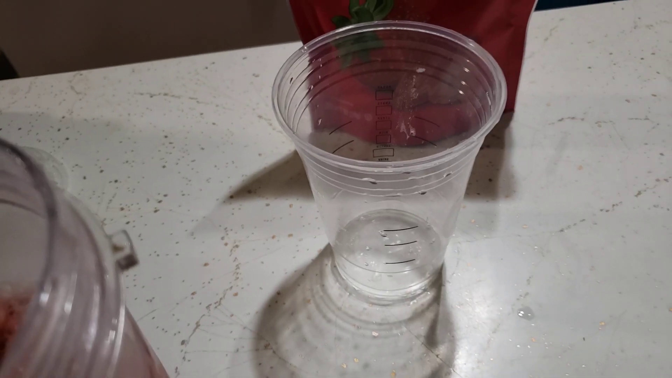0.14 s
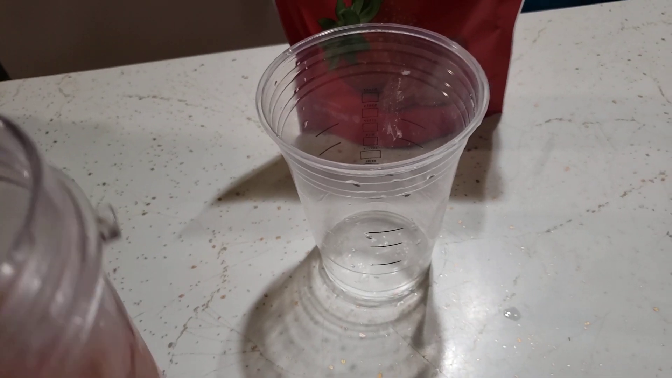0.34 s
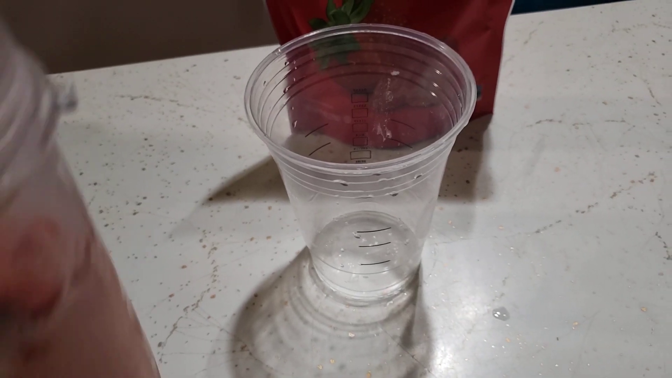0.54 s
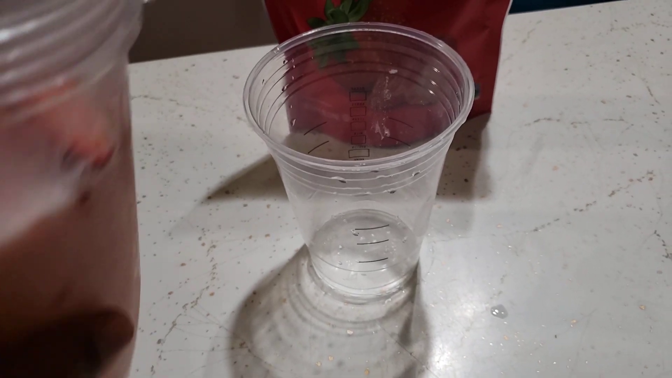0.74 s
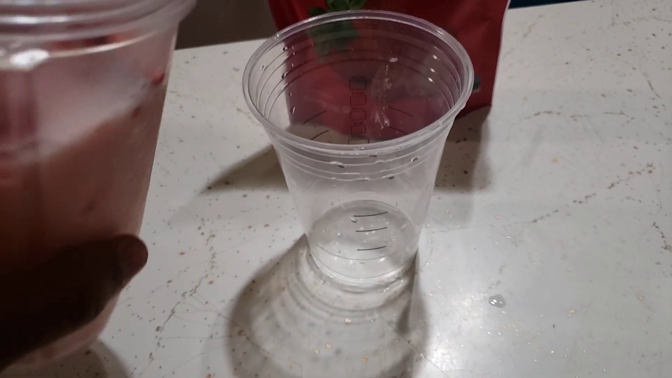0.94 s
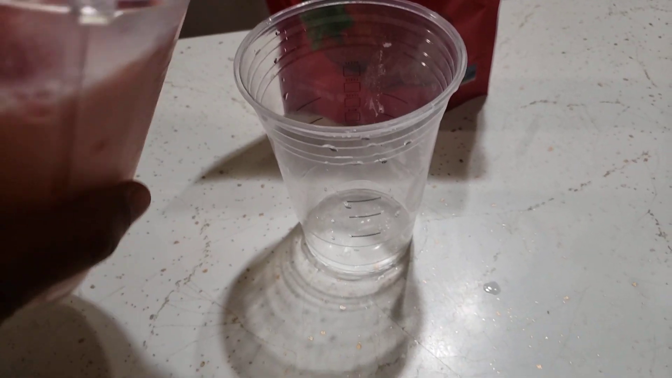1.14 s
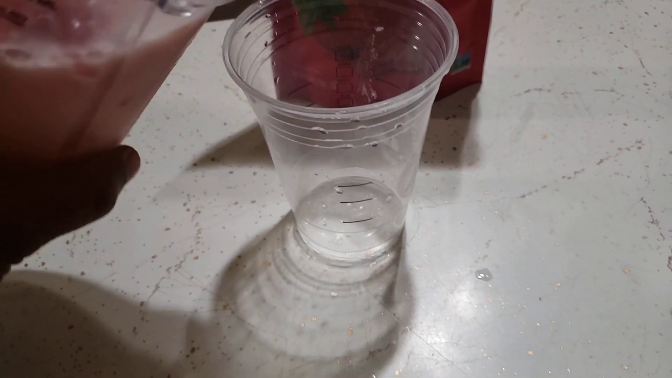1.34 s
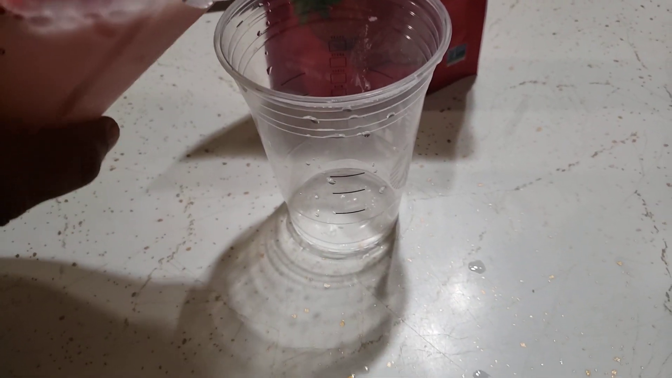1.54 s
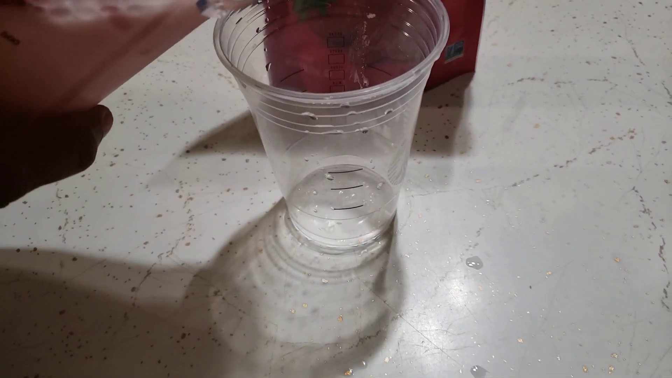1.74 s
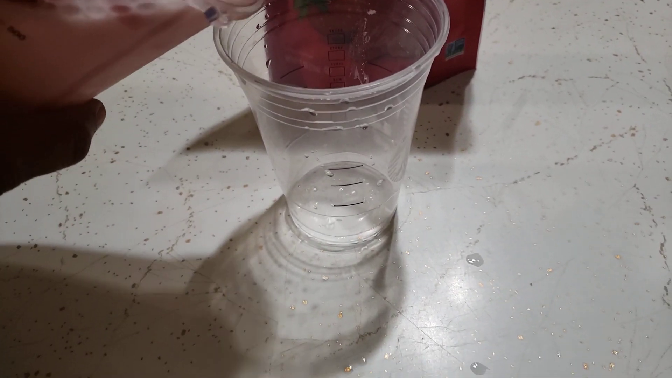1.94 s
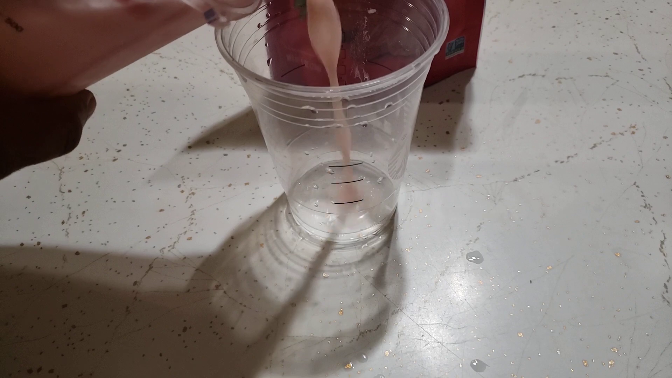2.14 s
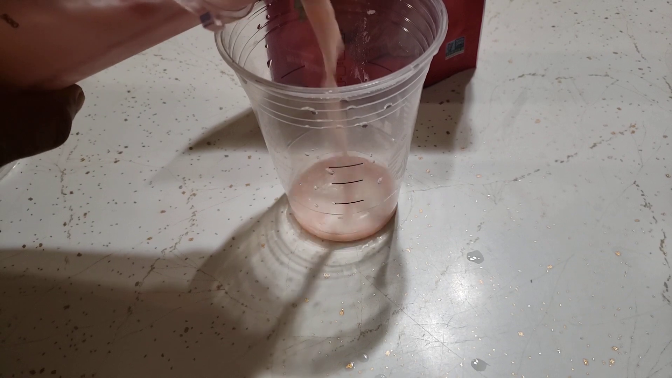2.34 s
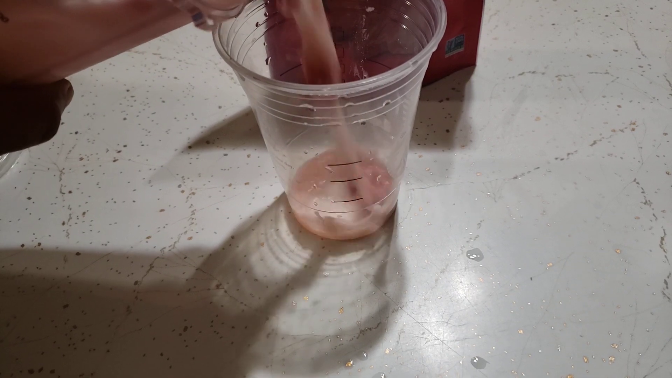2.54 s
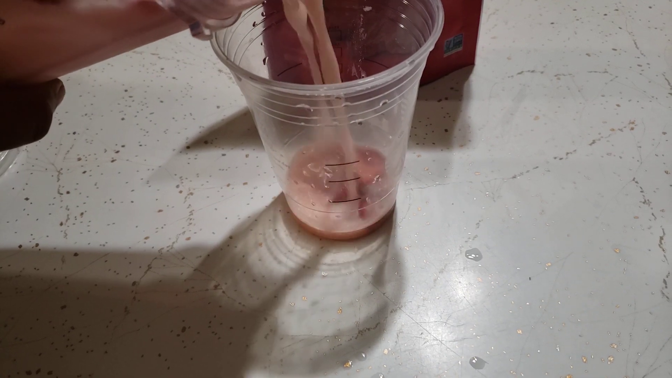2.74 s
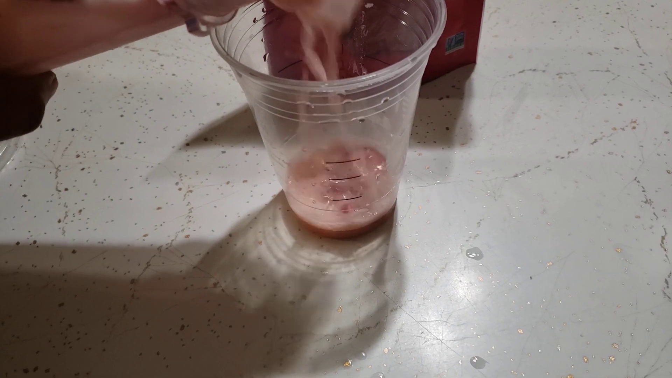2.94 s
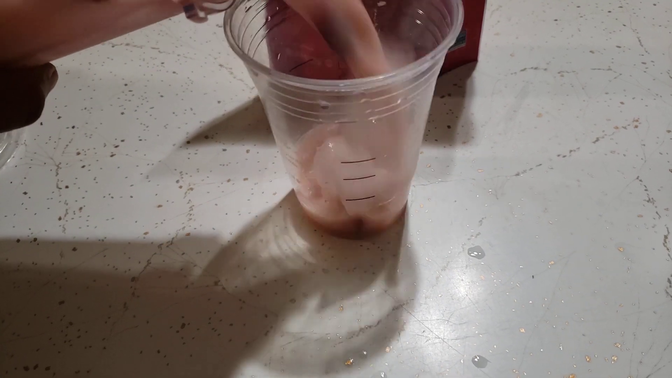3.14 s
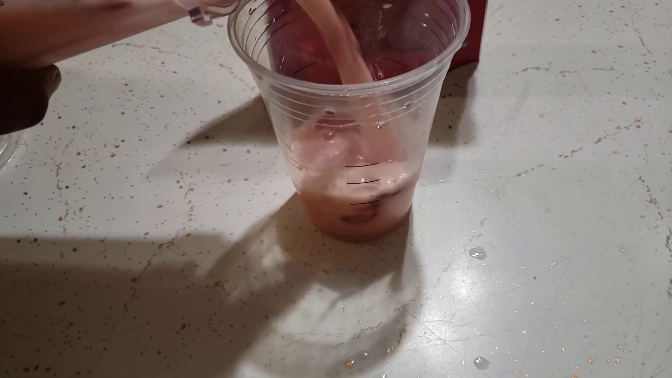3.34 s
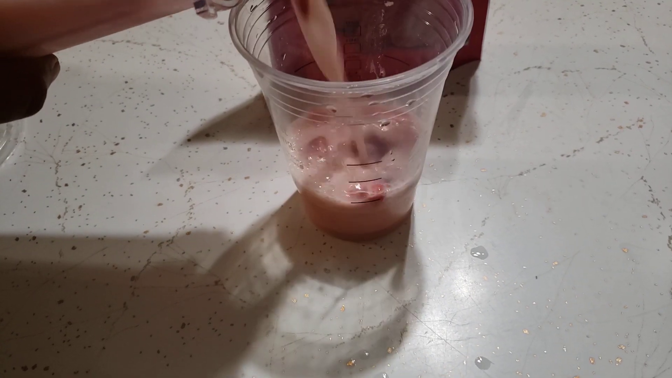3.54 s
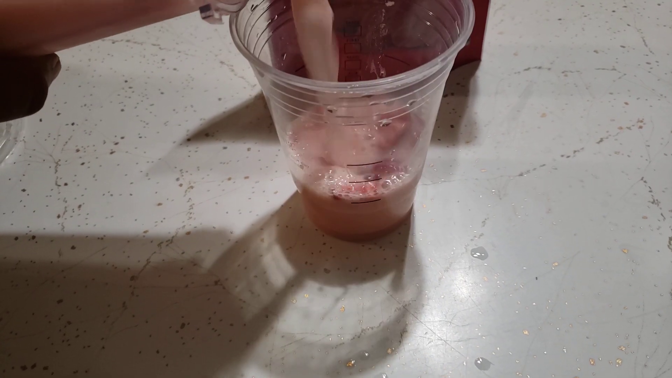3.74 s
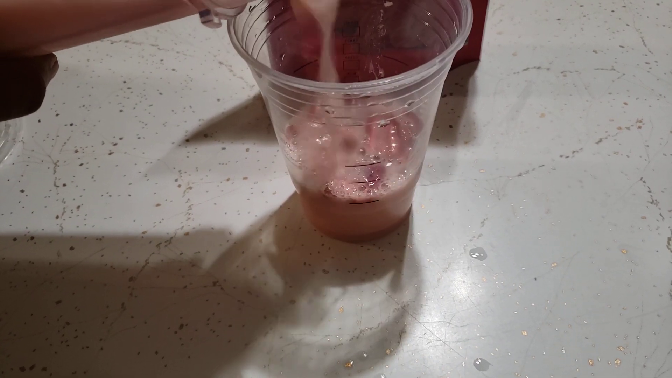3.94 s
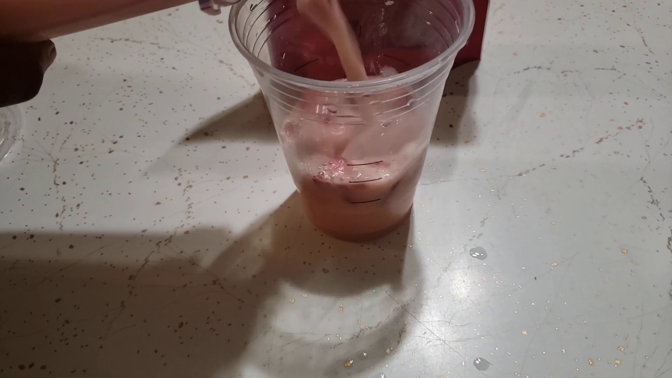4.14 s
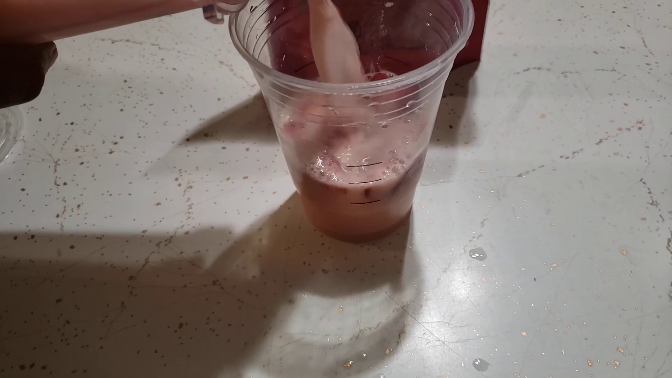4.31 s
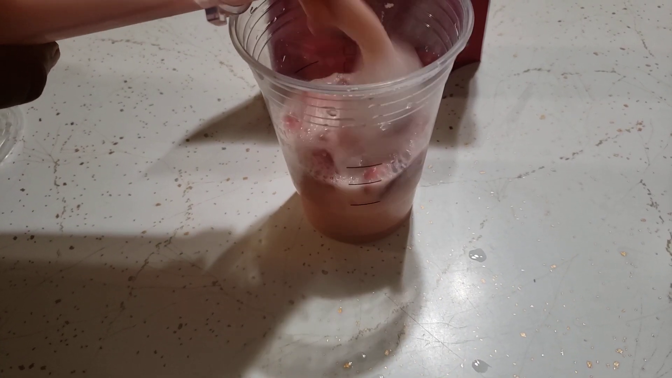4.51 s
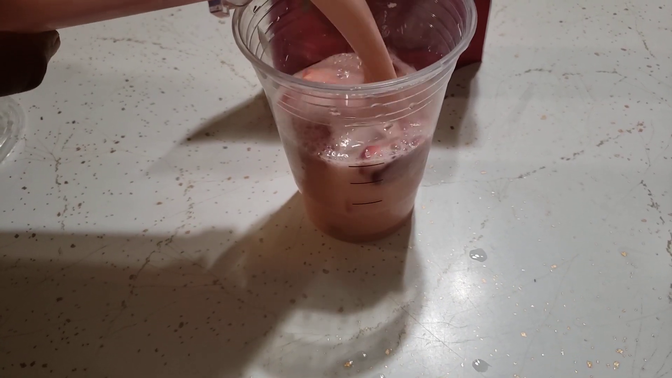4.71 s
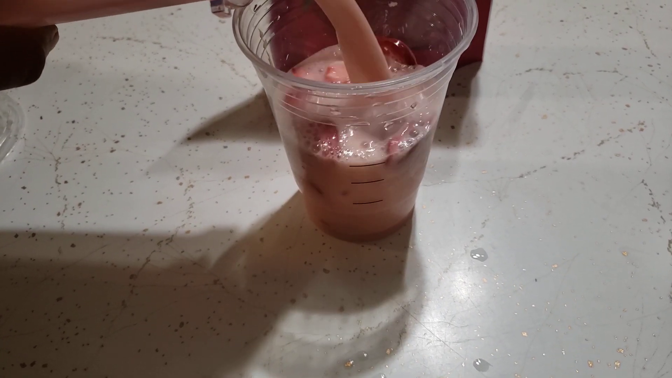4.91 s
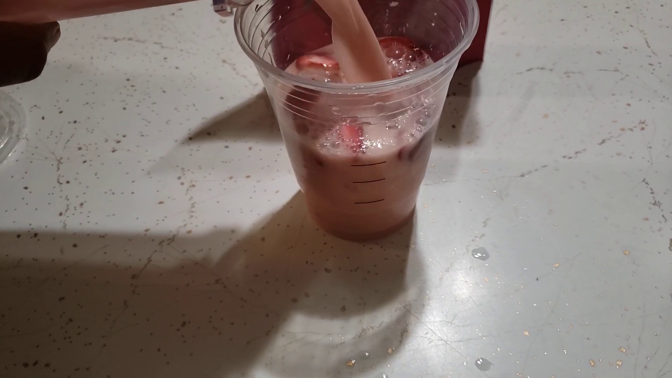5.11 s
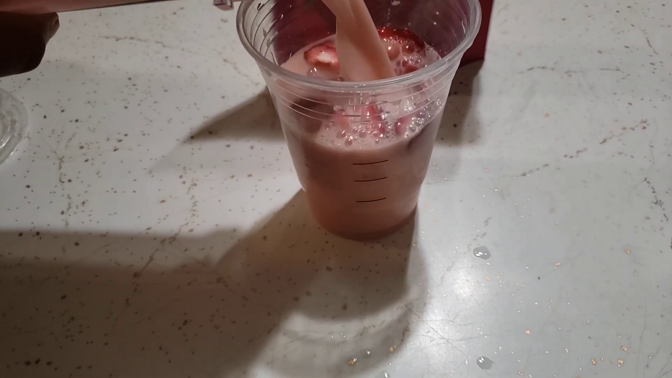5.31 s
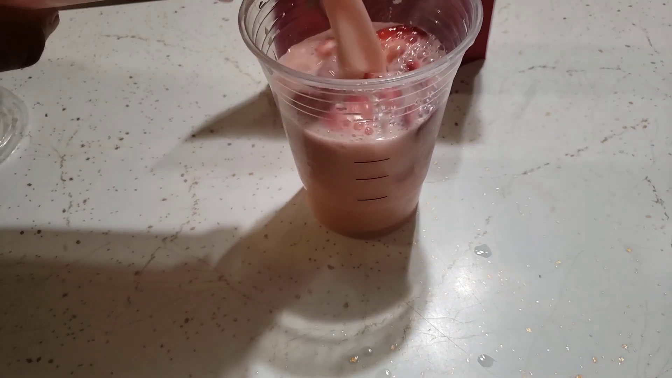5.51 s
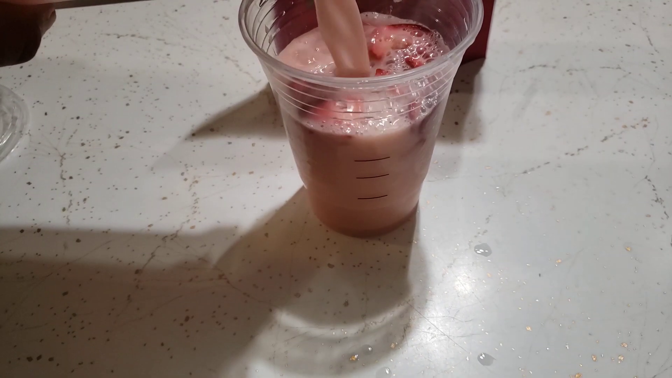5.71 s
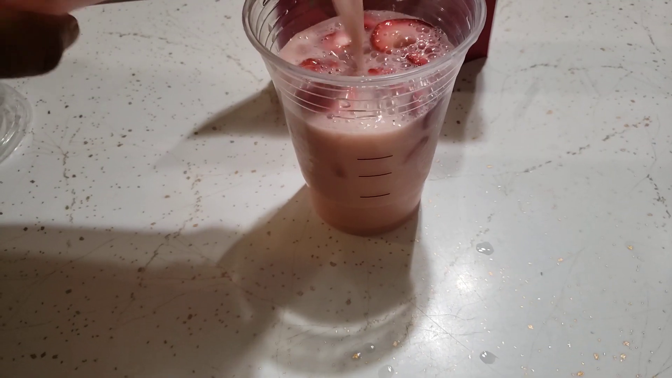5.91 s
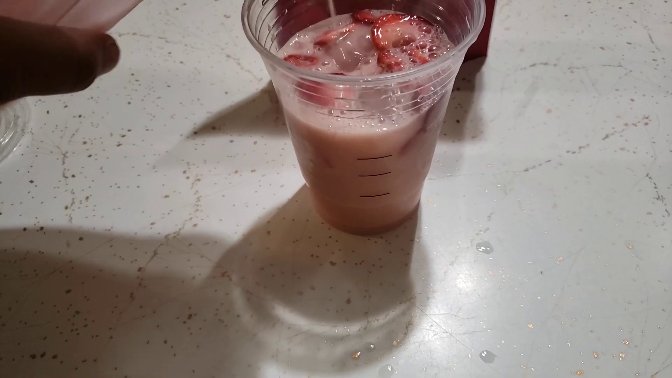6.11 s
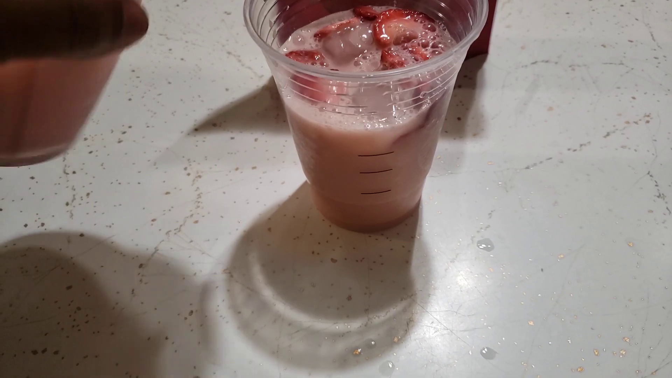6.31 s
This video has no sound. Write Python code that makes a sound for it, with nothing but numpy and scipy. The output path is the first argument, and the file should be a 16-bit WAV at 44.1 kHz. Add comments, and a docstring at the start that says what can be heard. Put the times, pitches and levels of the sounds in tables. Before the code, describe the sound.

Ice knocks dully in a plastic shaker, then a fruit drink splashes and plops into a thin cup, ending with a loud rattle of ice.

```python
"""A low hum and the rush of a fan come first, with thin hiss, a faint rub of fingers and dull knocks of ice.
At a kitchen counter, close to two microphones, a fruit drink is poured from a plastic shaker into a thin cup.
Noise bursts and struck modes make ice and walls; ringing air makes bubbles, gurgle and the plop of each lump.
Droplets patter and fizz at random, the stream goes quiet as the cup fills, and the last ice rattles and slides
in the drained shaker. Echoes with a decay for each band put the close sounds in the kitchen."""
import sys
import numpy as np
from scipy import signal
from scipy.fft import rfft, irfft, next_fast_len
from scipy.io import wavfile
from scipy.ndimage import uniform_filter1d

SR = 44100
rng = np.random.default_rng(int(sys.argv[2]) if len(sys.argv) > 2 else 0)


def persist_wave(psi):
    """Save psi, clipped to +-1, as 16-bit WAV."""
    counts = np.round(np.clip(psi, -1, 1) * 32767).astype(np.int16)
    wavfile.write(sys.argv[1], SR, np.atleast_2d(counts).T)


N = 285047

# All event levels are relative: the microphones, the kitchen and any named trim act on them later.
# room tone, the colour of the fan's rush: pitch_hz, level_db
FAN_RUSH_COLOUR = [(20, -29.5), (54, 24.5), (80, -12), (105, -1), (135, -1.5), (250, 0), (370, 0.5),
                   (470, -6), (650, -11.5), (950, -17.5), (1400, -29.5), (2200, -39), (5000, -44.5)]
# tones of the fan: pitch_hz, level_db (re its rush)
FAN_TONES = [(140, -14.5), (199, -12.5), (296, -9), (368, -12.5)]
# likeness of the rush at the two microphones: pitch_hz, correlation (-1 to 1)
RUSH_LIKENESS = [(60, 0.76), (180, 0.94), (550, 0.43), (1650, -0.07), (4970, -0.2), (15000, 0.22)]
# slow trim of fan and hum together: time_s, gain_db
LOW_BACKGROUND_TRIM = [(3.1, 5.5), (3.4, 0), (5.4, -0.5), (6.46, 1)]
# colour of the thin hiss: pitch_hz, level_db
HISS_COLOUR = [(1000, -28), (5000, -25), (7000, -16.5), (8500, -19.5), (11500, 5.5), (15500, 3)]
# strength of the hiss: time_s, level_db
HISS_LEVEL = [(1.45, -75), (1.6, -76), (4.8, -62.5), (6.46, -66.5)]
# fingers sliding on the shaker: start_s, length_s, level_db
FINGER_RUBS = [(.03, 0.23, -70.5), (.58, .55, -77)]
# ice against the shaker: start_s, level_db, pitch_hz (of the dull knock)
ICE_KNOCKS = [(.606, -49, 940), (0.941, -37, 1006), (.995, -46, 1040), (1.094, -36.5, 965),
              (1.138, -42, 1000), (1.521, -36, 980), (1.565, -37.5, 960), (1.904, -36, 925),
              (2.094, -43, 865), (2.152, -37.5, 870), (3.885, -32.5, 866), (4.93, -43, 1187),
              (5.019, -47, 1500), (5.078, -40, 1167), (5.281, -39, 1027), (5.378, -39.5, 1530),
              (5.445, -40, 1610), (5.481, -32, 1115), (5.535, -39.5, 1470), (5.59, -48, 1690),
              (5.645, -43.5, 985), (5.884, -43.5, 1460), (6.09, -25, 1370), (6.144, -15.5, 1560),
              (6.197, -9.5, 1600), (6.22, -13, 1520), (6.239, -18, 1510), (6.263, -13, 1064),
              (6.365, -22.5, 1626), (6.414, -33.5, 1480)]
# modes of the shaker wall: pitch_hz, width_hz, level_db
SHAKER_MODES = [(601, 25, 4), (1024, 130, -11), (1650, 62, 10.5), (2120, 84, 2), (2540, 99, 6.5),
                (2895, 120, -6), (3420, 160, -3.5), (4290, 87, -17), (5260, 290, -10), (5500, 530, -18)]
# drink damps the shaker wall until it drains: time_s, dull_knock_db, wall_ring_db (both re the blow)
SHAKER_DRAINING = [(2.2, -6.5, -38), (4.9, -6.5, -17.5), (5.9, -3.5, -37), (6.1, -15, -11.5)]
# colour of the tick of ice on plastic: pitch_hz, level_db
TICK_COLOUR = [(1000, -24), (3000, 9), (6000, -7), (9000, -13.5), (16000, -9)]
# floating ice jostles while the shaker tilts: start_s, length_s, level_db
ICE_JOSTLES = [(.93, 0.43, -63), (1.52, 0.24, -59), (1.85, .36, -65), (5.35, 0.56, -63.5)]
# the falling stream, before the trims in patter() and fizz(): time_s, wall_patter_db, fine_fizz_db
STREAM_LEVEL = [(2.2, -69, -63), (2.47, -54.5, -50.5), (2.56, -58.5, -38.5), (2.87, -52.5, -50.5),
                (3.21, -46.5, -45.5), (3.69, -67, -60.5), (3.93, -71, -64), (4.09, -64.5, -55),
                (4.33, -53.5, -60.5), (4.53, -62.5, -52.5), (4.7, -60.5, -69), (5.09, -85, -69.5),
                (5.48, -72, -69), (6.05, -90.5, -78)]
# modes of the thin cup wall: pitch_hz, width_hz, level_db
CUP_MODES = [(1500, 100, -2), (1890, 220, -1.5), (2380, 140, -29.5), (2707, 61, 11), (3560, 400, -6.5),
             (4110, 1300, -8.5)]
# the cup fills: time_s, air_pitch_hz, air_t60_s
CUP_FILLING = [(2.2, 747, 0.046), (3.15, 789, 0.091), (3.3, 872, .035), (4.1, 990, 0.019),
               (4.6, 1045, 0.028), (6.1, 1454, .02)]
# colour of the spray: pitch_hz, level_db
SPRAY_COLOUR = [(2500, -16.5), (4000, -6), (5500, -3.5), (7200, 2.5), (8400, -6.5), (11500, 4.5),
                (13500, 1), (16000, -1.5)]
# splats of liquid in the cup at set times: start_s, level_db
TIMED_SPLATS = [(2.204, -37.5), (2.247, -27), (2.268, -38.5), (2.33, -23.5), (2.339, -23.5), (2.379, -20.5),
                (2.41, -31), (2.435, -22.5), (2.497, -20), (2.606, -21.5), (2.717, -17), (2.814, -19.5),
                (2.85, -21), (2.956, -14.5), (2.971, -13.5), (3.103, -19), (3.178, -28), (3.354, -20.5),
                (3.477, -19), (3.635, -31.5), (3.666, -29.5), (3.902, -27), (3.919, -25), (3.95, -25),
                (3.988, -27), (4.046, -28.5), (4.115, -19), (4.223, -24.5), (4.281, -24.5), (4.333, -19.5),
                (4.341, -18.5), (4.418, -31), (4.49, -30)]
# lumps that skid down the cup wall: landing_s, level_db
LUMP_SKIDS = [(2.564, -27.5), (3.136, -21.5), (4.123, -30)]
# lumps of ice and fruit landing:
# start_s, level_db, trapped_air_hz, air_db (re the blow, before a trim), wall_db (re the blow), churn_t60_s
LUMP_LANDINGS = [(2.562, -15, 726, -11, -16.5, .04), (2.573, -11.5, 736, -28.5, -10.5, .06),
                 (2.665, -17.5, 680, -16, -19.5, .02), (2.854, -19, 796, -20, -5.5, .03),
                 (3.134, -5.5, 763, -8, -10, 0.12), (3.143, -13.5, 522, -9, -19.5, .02),
                 (3.217, -8, 624, -23, -13.5, .04), (3.229, -14, 580, -17, -7, 0.027),
                 (3.237, -7.5, 860, -16.5, -12, .35), (4.121, -7.5, 1460, -9, -13.5, 0.11),
                 (4.183, -22, 1010, -7, -12, .04), (4.562, -4, 1002, -9, -14.5, .17),
                 (4.607, -14, 1130, -6.5, -18, .12), (4.682, -21.5, 1200, -14.5, -16.5, .06),
                 (4.747, -32, 1033, -2, -20.5, .06)]
# floating ice bobs against the nearly full cup: start_s, length_s, level_db
ICE_BOBS = [(4.7, 1.5, -64)]
# decay of the kitchen tail: pitch_hz, t60_s
KITCHEN_DECAY = [(200, 1.1), (800, 0.72), (2500, 0.17), (7000, 0.52), (15000, .5)]
# colour of the kitchen tail: pitch_hz, level_db
KITCHEN_COLOUR = [(200, -10), (800, -9.5), (2500, -9), (7000, -8), (15000, -12)]
# nearness of the cup to the left microphone: pitch_hz, gain_db (added on the left, taken off the right)
LEFT_NEARNESS = [(250, .5), (600, 4.5), (1100, 2.5), (4000, 3.5), (8000, 3.8), (16000, -1.9)]
# phase by which the left channel leads the right for the close sounds: pitch_hz, phase_rad
LEFT_LEAD = [(150, .3), (400, 1), (700, 1.82), (1100, 1.05), (2000, 1.67), (4000, 2.09), (16000, 1.35)]

GRAIN_TIME = np.arange(4096) / SR  # seconds within one short blow
TIME = np.arange(N) / SR  # seconds
SIZE = next_fast_len(N, real=True)
EDGE_HZ = 16050  # upper band limit
POUR_START_S = STREAM_LEVEL[0][0]

# steady background before its slow trim: level of the fan's rush and of the hum
FAN_DB, HUM_DB, HUM_HZ = -54, -52.5, 49.4

# gurgle and bubbles follow the patter only in part: level at full flow, and change per dB of patter
FULL_FLOW_DB, GURGLE_DB, GURGLE_PER_DB = -51.5, -52, 0.7

# rising drink damps the cup wall: its ring under a splat at the start of the pour, and the fall
BARE_WALL_DB, WALL_DAMPING_DB_PER_S = -16, 8

# a lump that plunges traps air, one that slaps throws spray:
# spray and thump (dB re the blow) at an air level of PLUNGE_DB, and their change per dB of air
PLUNGE_DB = -11.5
SPRAY_DB, SPRAY_PER_DB = -16.5, -0.66
THUMP_DB, THUMP_PER_DB = -29, -0.28

# the drink closes over a lump in gulps: mean spacing, start level re the lump, make-up of a gulp;
# GULP_THUMP_DB is added to the thump above
GULP_GAP_S, GULP_DB = .0105, -2.5
GULP_AIR_DB, GULP_WALL_DB, GULP_THUMP_DB = -10, -13, 7.5

# the last ice slides along the drained shaker: a swell to its peak, a hold, then a fade
SLIDE_PEAK_S, SLIDE_HOLD_S, SLIDE_DB = 6.17, 0.039, -34
SLIDE_SWELL_DB_PER_S, SLIDE_FADE_DB_PER_S = 498, 187


def amp(db):
    """Decibels to gain."""
    return 10 ** (np.asarray(db) / 20)


def evened(x):
    """Scales to rms 1."""
    return x / np.sqrt(np.mean(x ** 2) + 1e-20)


def peaked(x):
    """Scales a stereo blow so that its loudest 3 ms have rms 1."""
    power = uniform_filter1d((x ** 2).mean(0), size=132, mode="constant")
    return x / np.sqrt(power.max() + 1e-20)


def read(points, hz):
    """Reads a spectrum on a log-frequency axis."""
    f, value = np.transpose(points)
    return np.interp(np.log(hz + 1), np.log(f + 1), value)


def follow(rows, t):
    """Reads every column of a curve at the times t."""
    s, *columns = np.transpose(rows)
    return [np.interp(t, s, column) for column in columns]


def add(mix, s, sound):
    """Adds a stereo sound at a time in seconds."""
    part = mix[:, max(round(s * SR), 0):][:, :sound.shape[1]]
    part += sound[:, :part.shape[1]]


def colour(x, points):
    """Filters by a spectrum, causally (minimum phase), so that attacks stay sharp."""
    size = 1024
    log_gain = np.log(amp(read(points, abs(np.fft.fftfreq(size, 1 / SR)))))
    spectrum = np.exp(np.conj(signal.hilbert(log_gain)))
    taps = np.fft.ifft(spectrum).real[:size // 2]
    return signal.oaconvolve(x, taps[None], axes=1)[:, :x.shape[1]]


def band(x, lo_hz, hi_hz):
    """Band-passes a sound."""
    sos = signal.butter(2, [lo_hz, min(hi_hz, .48 * SR)], "band", fs=SR, output="sos")
    return signal.sosfilt(sos, x)


def partly_alike(left, other, same):
    """Shares part of the left signal with the right, as at two spaced microphones."""
    return np.array([left, same * left + np.sqrt(1 - same ** 2) * other])


def crack(t60, same=.45, rise_s=0.00022):
    """A burst of noise swells and dies at once, partly alike at the two microphones."""
    left, other = rng.standard_normal((2, len(GRAIN_TIME)))
    shape = (1 - np.exp(-GRAIN_TIME / rise_s)) * amp(-60 * GRAIN_TIME / t60)
    return partly_alike(left, other, same) * shape


def ring(modes, scatter_db=2.5, detune=0.014):
    """Struck wall modes die at rates set by their widths; each call weights and tunes them anew."""
    hz, width, db = np.transpose(modes)[:, :, None]
    hz = hz * (1 + detune * rng.standard_normal(hz.shape))
    level = amp(db + scatter_db * rng.standard_normal((2, *hz.shape)))
    size = width * level * rng.choice([-1, 1], hz.shape)
    decay = np.exp(-np.pi * width * GRAIN_TIME)
    return (size * decay * np.sin(2 * np.pi * hz * GRAIN_TIME)).sum(1)


def short_note(hz, t60, rise=0.067):
    """A bubble or dull knock rings up within a cycle and dies; a positive rise lifts its pitch."""
    shape = (1 - np.exp(-(GRAIN_TIME * hz / 0.62) ** 2)) * amp(-60 * GRAIN_TIME / t60)
    stretch = 1 + rise * np.minimum(GRAIN_TIME / t60, 1)
    note = np.sin(2 * np.pi * hz * GRAIN_TIME * stretch) * shape
    return np.array([note, note])


def wet(x, t60):
    """A soft, wet contact spreads a blow over a few milliseconds."""
    contact = crack(t60, rise_s=0.0024)[:1]
    return peaked(signal.fftconvolve(x, contact, axes=1)[:, :len(GRAIN_TIME)])


def shower(grain, per_s, spread_db):
    """Repeats a grain at random moments, mostly small and now and then large."""
    out = np.zeros((len(grain), N))
    for where, chance in rng.random((int(per_s * N / SR) + 1, 2)):
        boost_db = spread_db * min(-np.log(1 - chance), 3.5)
        add(out, where * N / SR, grain[:, :1024] * amp(boost_db))
    return out


def swells(rows, skew):
    """One swell per row; a skew under 1 brings the peak early: a steep rise, then a long fall."""
    total = np.zeros(N)
    for start_s, length_s, db in rows:
        progress = np.clip((TIME - start_s) / length_s, 0, 1)
        total += amp(db) * np.sin(np.pi * progress ** skew)
    return total


def tone(hz, waver):
    """A motor tone of rms about 1 whose phase wanders (waver in radians, a new value every 0.1 s)."""
    knots = np.arange(0, N / SR + 1, .1)
    wander = np.interp(TIME, knots, rng.standard_normal(len(knots)))
    return np.sqrt(2) * np.sin(2 * np.pi * hz * TIME + waver * wander)


def fan():
    """Coloured noise makes the rush of air, partly alike at the microphones, under wandering motor tones."""
    hz = np.fft.rfftfreq(SIZE, 1 / SR)
    left, other = rfft(rng.standard_normal((2, SIZE)))
    spectrum = partly_alike(left, other, read(RUSH_LIKENESS, hz))
    rush = irfft(spectrum * amp(read(FAN_RUSH_COLOUR, hz)))[:, :N]
    rush = signal.sosfilt(signal.butter(4, 72, "high", fs=SR, output="sos"), rush)
    return evened(rush) + sum(amp(db) * tone(f, waver=1.18) for f, db in FAN_TONES)


def hiss():
    """Thin coloured noise, independent at the two microphones, follows a slow level curve."""
    noise = rng.standard_normal((2, N))
    return amp(follow(HISS_LEVEL, TIME)[0]) * evened(colour(noise, HISS_COLOUR))


def finger_rub():
    """Fingers sliding on the shaker make faint swells of narrow high noise."""
    return swells(FINGER_RUBS, skew=0.48) * evened(band(rng.standard_normal((2, N)), 6330, 7400))


def background(left_db=0.77):
    """Fan and hum lean slightly left, beside the hiss and the finger rub."""
    steady = amp(FAN_DB) * fan() + amp(HUM_DB) * tone(HUM_HZ, waver=.12)
    low = amp(follow(LOW_BACKGROUND_TRIM, TIME)[0]) * steady
    return low * amp([[left_db], [-left_db]]) + hiss() + finger_rub()


def knocks(tick_db=-2, snap_db=-2, dull_db=-3, knock_t60=0.041, delay_s=.001):
    """Ice strikes the shaker; while drink damps the wall, mostly a dull knock is left."""
    out = np.zeros((2, N))
    for s, db, hz in ICE_KNOCKS:
        knock_db, wall_db = follow(SHAKER_DRAINING, s)
        dull = peaked(band(band(crack(0.038, same=0.6), 0.57 * hz, 1.15 * hz), 610, 1970))
        knock = peaked(peaked(short_note(hz, knock_t60, rise=0)) + amp(dull_db) * dull)
        tick = peaked(colour(crack(.018, rise_s=.0008), TICK_COLOUR))
        snap = peaked(band(crack(0.0027, same=0.47, rise_s=.0001), 1700, 4200))
        wall = peaked(ring(SHAKER_MODES, scatter_db=3.5, detune=0.013))
        wall = wall + amp(tick_db) * tick + amp(snap_db) * snap
        add(out, s + delay_s, amp(db) * (amp(knock_db) * knock + amp(wall_db) * wall))
    return out


def jostle(low_hz=850, high_hz=1150, knock_t60=0.027, wall_db=-16, count=6):
    """Floating ice nudges the shaker in many faint, dull knocks."""
    nudges = np.zeros((2, N))
    for hz in np.geomspace(low_hz, high_hz, count):
        knock = peaked(short_note(hz, knock_t60, rise=0))
        wall = peaked(ring(SHAKER_MODES))
        nudges += shower(knock + amp(wall_db) * wall, per_s=11, spread_db=3.5)
    return swells(ICE_JOSTLES, skew=0.25) * evened(nudges)


def patter(level_db, gain_db=2, count=20):
    """Droplets strike the modes of the cup wall at random."""
    drops = np.zeros((2, N))
    for _ in range(count):
        tap = peaked(ring(CUP_MODES, scatter_db=4.5, detune=0.066))
        drops += shower(tap, per_s=12, spread_db=6.5)
    return amp(level_db) * amp(gain_db) * evened(drops)


def fizz(level_db, gain_db=1, ping_db=-5, count=20):
    """Tiny bursts of spray, each with the ping of a tiny bubble, take the colour of the spray."""
    bursts = np.zeros((2, N))
    for hz in np.geomspace(4000, 15000, count):
        burst = peaked(crack(.008, rise_s=.001)) + amp(ping_db) * peaked(short_note(hz, 0.0081))
        bursts += shower(burst, per_s=16, spread_db=5.5)
    return amp(level_db + gain_db) * evened(colour(bursts, SPRAY_COLOUR))


def bubbles(count=20):
    """Pockets of air ring at random, larger and lower ones for longer."""
    out = np.zeros((2, N))
    for hz in np.geomspace(900, 3400, count):
        out += shower(short_note(hz, 28 / hz, rise=.06), per_s=4, spread_db=4.0)
    return evened(out)


def gurgle(patter_db, bubbles_gain_db=-3, width_hz=170):
    """Random pushes ring the air in the filling cup at a rising pitch, with bubbles on top."""
    turn = np.exp(2j * np.pi * np.cumsum(follow(CUP_FILLING, TIME)[0]) / SR)
    pushes = shower(np.ones((1, 1)), per_s=130, spread_db=5.5)
    # a one-pole filter in the turning frame is a resonator whose pitch glides
    resonance = signal.lfilter([1], [1, -np.exp(-np.pi * width_hz / SR)], pushes / turn)
    air = (turn * resonance).imag
    level_db = GURGLE_DB + GURGLE_PER_DB * (patter_db - FULL_FLOW_DB)
    return amp(level_db) * (evened(air) + amp(bubbles_gain_db) * bubbles())


def stream():
    """Patter, fizz and gurgle begin with the pour and follow its flow."""
    patter_db, fizz_db = follow(STREAM_LEVEL, TIME)
    flowing = TIME > POUR_START_S
    return flowing * (gurgle(patter_db) + patter(patter_db) + fizz(fizz_db))


def splat(s, spray_db=-8, ping_db=-6, ping_hz=10200, ping_spread=.2, wall_scatter_db=3.5,
          spray_t60=.014, ping_t60=0.0076):
    """A splat taps the cup wall, throws fine spray and traps one tiny bubble."""
    size, place = rng.standard_normal(2)
    hz = min(ping_hz * np.exp(ping_spread * size), EDGE_HZ)
    damping_db = WALL_DAMPING_DB_PER_S * (s - POUR_START_S)
    wall_db = BARE_WALL_DB - damping_db + wall_scatter_db * place
    wall = wet(ring(CUP_MODES, detune=.07), t60=0.013)
    mist = peaked(colour(crack(spray_t60, rise_s=0.0027), SPRAY_COLOUR))
    ping = wet(short_note(hz, ping_t60, rise=.02), t60=.005)
    spray = peaked(mist + amp(ping_db) * ping)
    return amp(wall_db) * wall + amp(spray_db) * spray


def splats(stray_db=22, stray_spread_db=3.5, stray_end_s=4.9, count=26):
    """Splats at set times, and stray ones at random times whose strength follows the fizz of the stream."""
    out = np.zeros((2, N))
    for s, db in TIMED_SPLATS:
        add(out, s, amp(db) * splat(s))
    for k in range(count):
        s = POUR_START_S + (k + rng.random()) / count * (stray_end_s - POUR_START_S)
        fizz_db = follow(STREAM_LEVEL, s)[1]
        db = fizz_db + stray_db + stray_spread_db * rng.standard_normal()
        add(out, s, amp(db) * splat(s, ping_hz=7230, ping_db=-0.5))
    return out


def skids(swell_t60=0.026):
    """A skidding lump scrapes the cup wall: a dying noise burst, reversed, swells until it lands."""
    out = np.zeros((2, N))
    for s, db in LUMP_SKIDS:
        scrape = peaked(band(crack(swell_t60), 900, 12000))[:, ::-1]
        add(out, s - GRAIN_TIME[-1], amp(db) * scrape)
    return out


def plop(hz, air_t60, air_db, wall_db, thump_db=0, air_gain_db=-0.5, crunch_db=0,
         slosh_db=-4, slosh_low=0.55, slosh_high=1.31):
    """A blow on the drink thumps the base, rings the trapped air and the wall, and splashes."""
    thump = peaked(band(crack(.035, same=.9, rise_s=.003), 110, 460))
    slosh = peaked(band(crack(0.027, same=0.75), slosh_low * hz, slosh_high * hz))
    air = peaked(peaked(short_note(hz, air_t60, rise=0.035)) + amp(slosh_db) * slosh)
    crunch = peaked(band(crack(.026, rise_s=0.003), 800, 4200))
    wall = peaked(wet(ring(CUP_MODES, detune=0.062), t60=0.014) + amp(crunch_db) * crunch)
    spray = peaked(colour(crack(.018, rise_s=0.0016), SPRAY_COLOUR))
    depth_db = air_db - PLUNGE_DB  # more trapped air means a deeper plunge
    low = amp(THUMP_DB + thump_db + THUMP_PER_DB * depth_db) * thump
    low = low + amp(air_db + air_gain_db) * air
    return low + amp(wall_db) * wall + amp(SPRAY_DB + SPRAY_PER_DB * depth_db) * spray


def lumps(gap_jitter=.2, pitch_jitter=.09, delay_s=.001, count=5):
    """Each lump plops in; gulps near the pitch of the air in the cup follow and die away."""
    out = np.zeros((2, N))
    for s, db, hz, air_db, wall_db, churn_t60 in LUMP_LANDINGS:
        cup_hz, air_t60 = follow(CUP_FILLING, s)
        add(out, s + delay_s, amp(db) * plop(hz, air_t60, air_db, wall_db))
        for k, (late, sharp) in enumerate(rng.standard_normal((count, 2)), 1):
            after_s = GULP_GAP_S * (k + gap_jitter * late)
            gulp_hz = cup_hz * np.exp(pitch_jitter * sharp)
            gulp = plop(gulp_hz, air_t60, GULP_AIR_DB, GULP_WALL_DB, GULP_THUMP_DB)
            add(out, s + after_s, amp(db + GULP_DB - 60 * after_s / churn_t60) * gulp)
    return out


def bobbing(count=6):
    """Floating ice taps the modes of the cup wall, lightly and at random."""
    taps = np.zeros((2, N))
    for _ in range(count):
        taps += shower(peaked(ring(CUP_MODES, scatter_db=1, detune=.04)), per_s=4.4, spread_db=8.5)
    return swells(ICE_BOBS, skew=.5) * evened(taps)


def slide(count=6):
    """Sliding ice keeps the shaker wall ringing with many small contacts."""
    contacts = np.zeros((2, N))
    for _ in range(count):
        contacts += shower(ring(SHAKER_MODES, detune=.008), per_s=55, spread_db=4.5)
    t = TIME - SLIDE_PEAK_S
    swell_db = SLIDE_SWELL_DB_PER_S * np.minimum(t, 0)
    fade_db = SLIDE_FADE_DB_PER_S * np.maximum(t - SLIDE_HOLD_S, 0)
    return amp(SLIDE_DB + swell_db - fade_db) * evened(contacts)


def microphones(x):
    """The close sound is shifted in phase between the channels, the right lagging the left, and is louder on
    the left but in the top treble."""
    hz = np.fft.rfftfreq(SIZE, 1 / SR)
    left = amp(read(LEFT_NEARNESS, hz))
    right = np.exp(-1j * read(LEFT_LEAD, hz)) / left
    return irfft(rfft(x, SIZE) * np.array([left, right]))[:, :N]


def kitchen(x, wet_db, early_db=-9, early_t60=0.13):
    """Early echoes from counter and cupboards, then a noise tail that dies band by band."""
    size = SR * 2 // 3
    t = np.arange(size) / SR
    hz, frame_s, z = signal.stft(rng.standard_normal((2, size)), SR, nperseg=256)
    t60 = read(KITCHEN_DECAY, hz)[:, None]
    z = z * amp(read(KITCHEN_COLOUR, hz)[:, None] - 60 * frame_s / t60)
    z = z * np.sqrt(np.log(10 ** 6) / (t60 * SR))  # evens the energy of long and short decays
    tail = signal.istft(z, SR, nperseg=256)[1][:, :size] * np.clip(t / 0.0072, 0, 1)
    arrivals = (rng.random((2, size)) < 900 / SR) * (t > .002)  # 900 a second on average, after 2 ms
    early = rng.standard_normal((2, size)) * arrivals * amp(-60 * t / early_t60)
    early *= amp(early_db) / np.linalg.norm(early, axis=1, keepdims=True)
    return amp(wet_db) * signal.fftconvolve(x, tail + early, axes=1)[:, :N]


def scene():
    """Cup and shaker close to the microphones, the kitchen around them."""
    shaker = knocks() + jostle() + slide()
    liquid = stream() + splats()
    ice = skids() + lumps() + bobbing()
    echoes = kitchen(liquid, wet_db=-1.5) + kitchen(ice, wet_db=-3) + kitchen(shaker, wet_db=-0.5)
    return microphones(liquid + ice + shaker) + echoes + background()


def record(dry):
    """Full scale caps the hardest blows; then a low-pass sets the band limit."""
    taps = signal.firwin(511, EDGE_HZ, window=("kaiser", 9), fs=SR)
    return signal.oaconvolve(np.clip(dry, -1, 1), taps[None], "same")


dry = scene()
out = record(dry)
persist_wave(out)
```